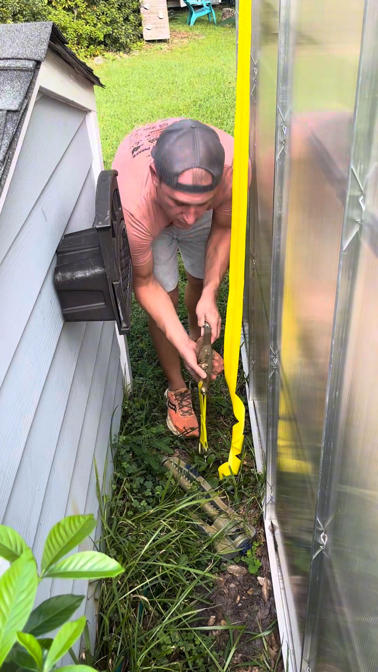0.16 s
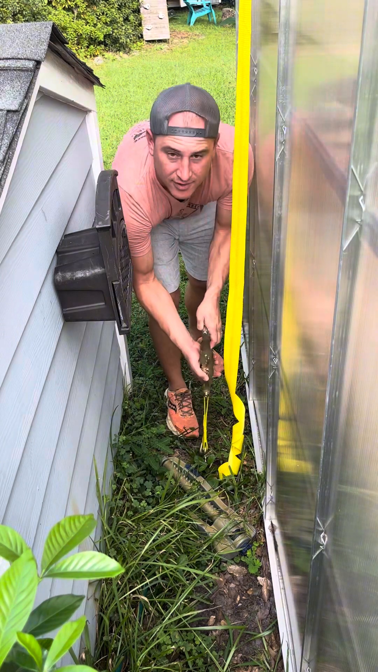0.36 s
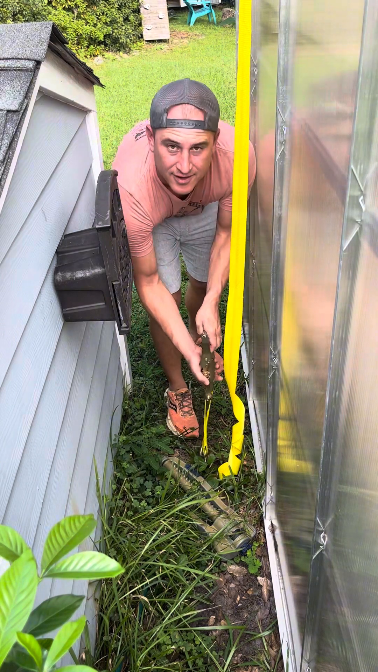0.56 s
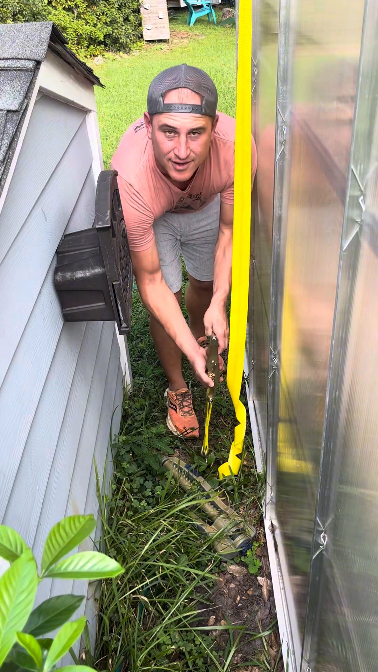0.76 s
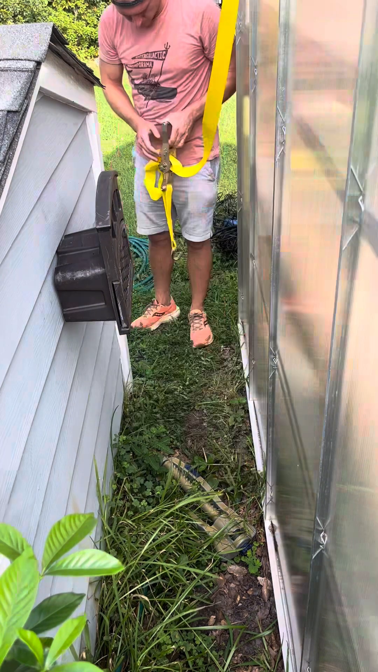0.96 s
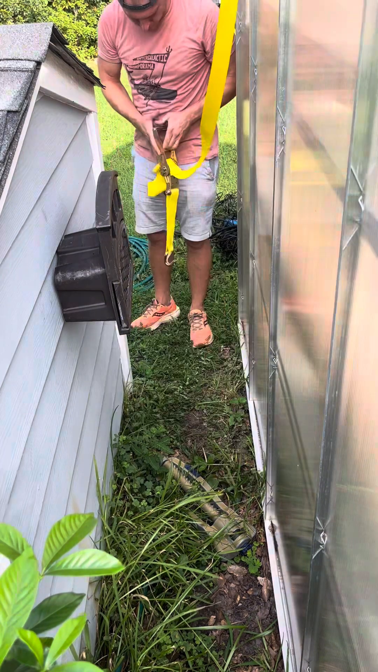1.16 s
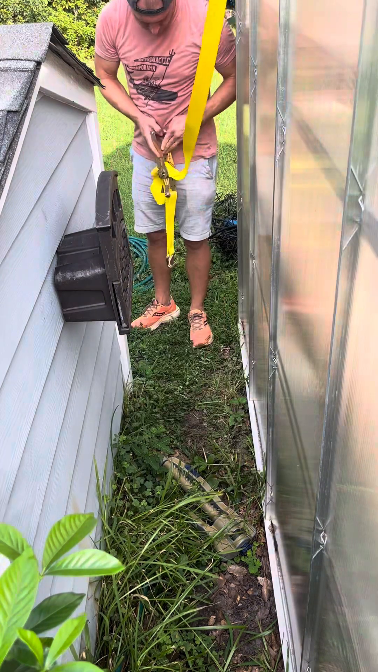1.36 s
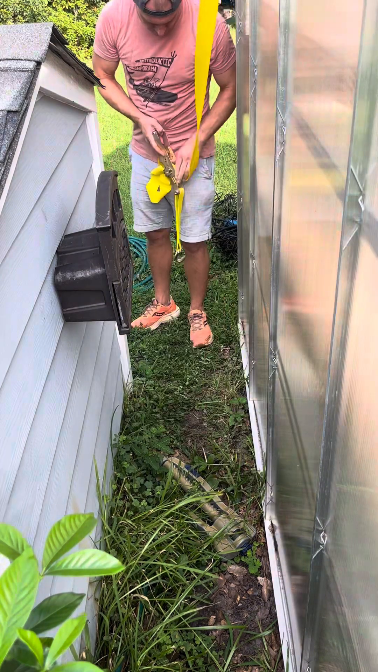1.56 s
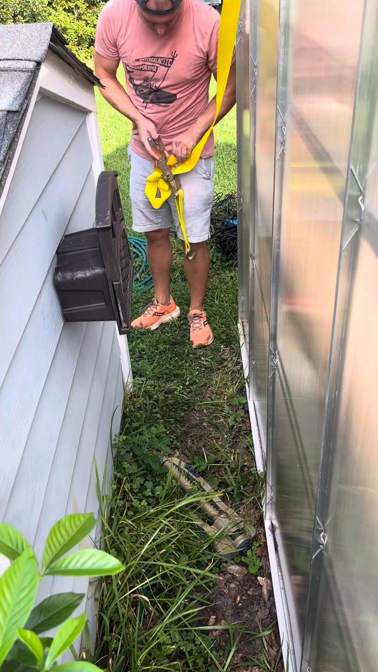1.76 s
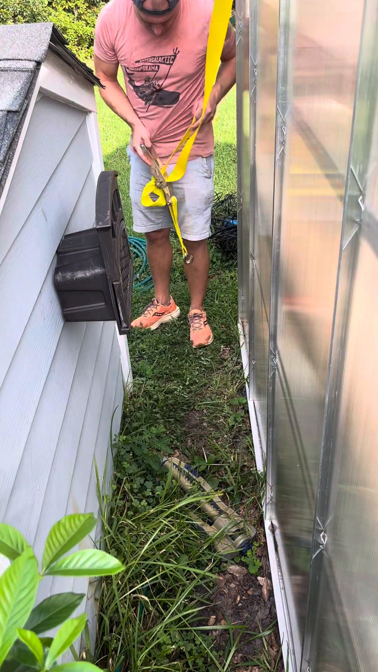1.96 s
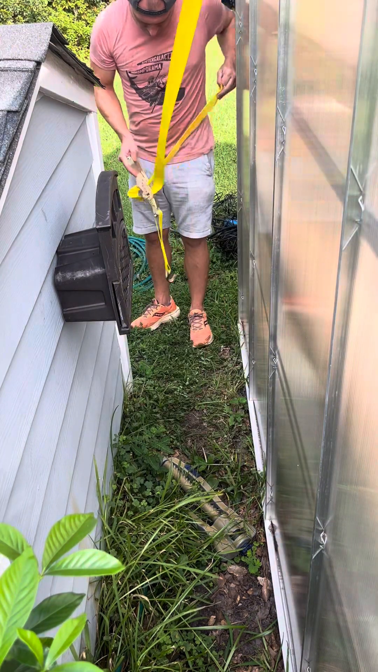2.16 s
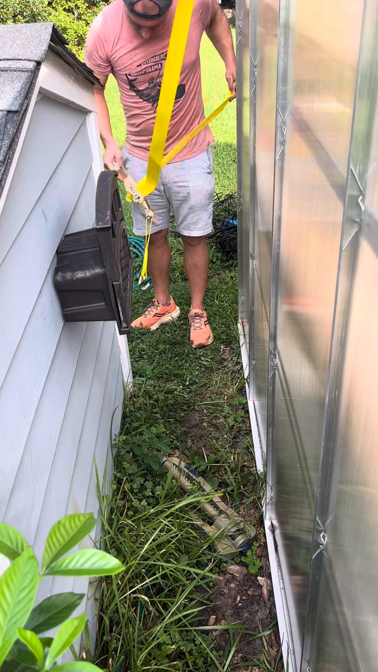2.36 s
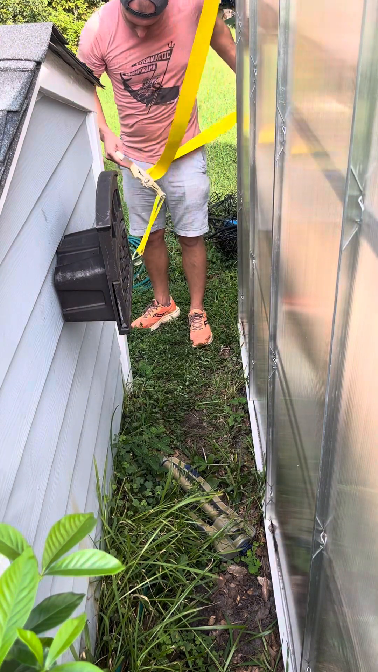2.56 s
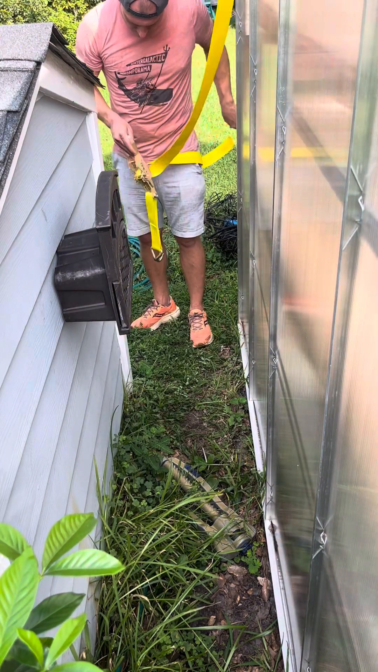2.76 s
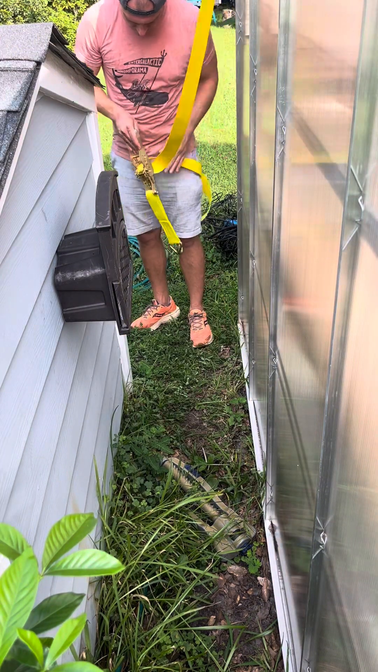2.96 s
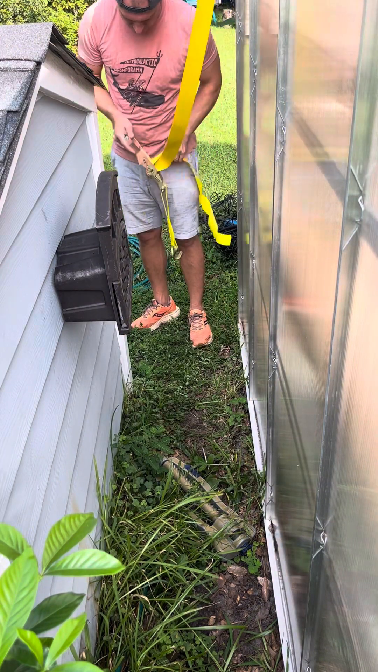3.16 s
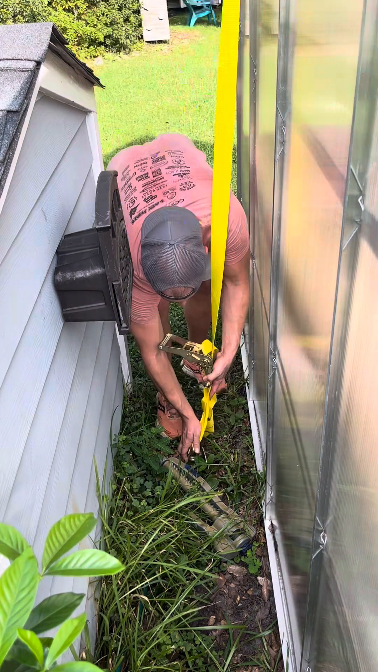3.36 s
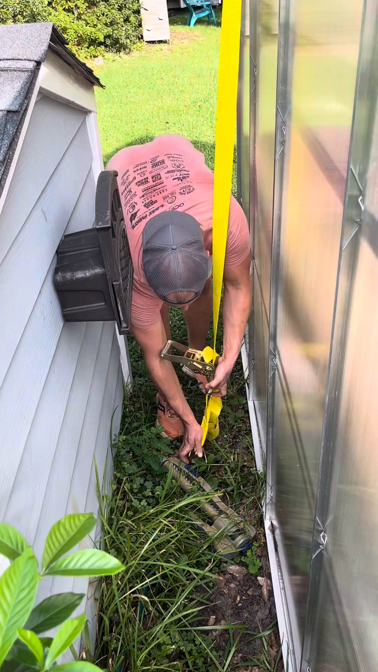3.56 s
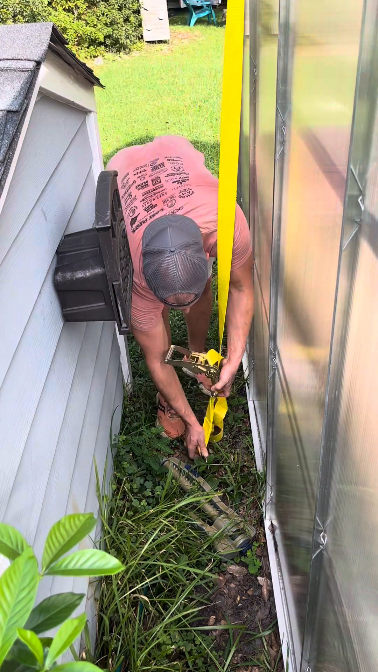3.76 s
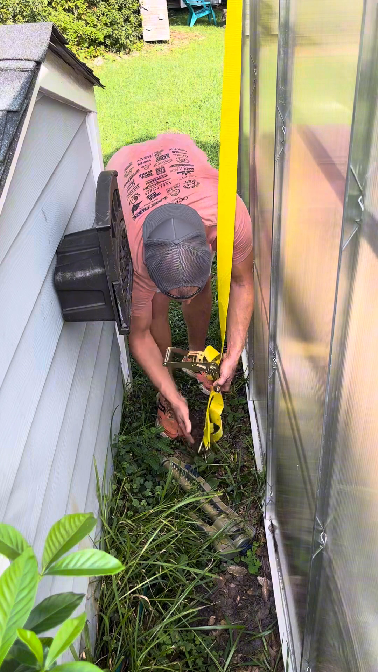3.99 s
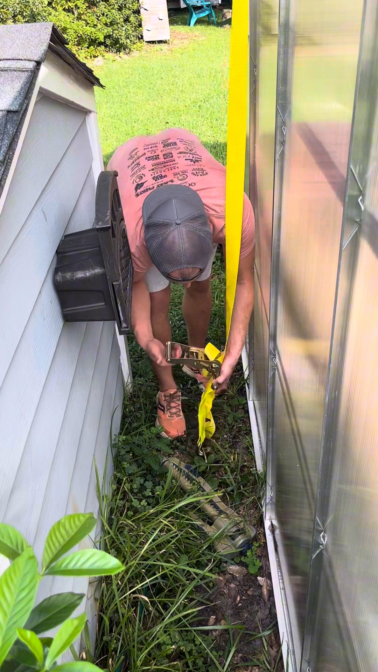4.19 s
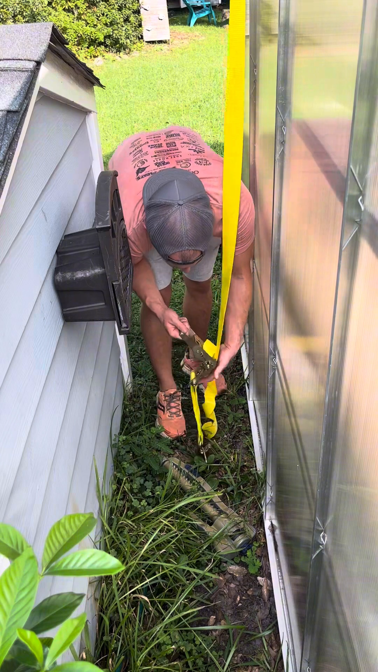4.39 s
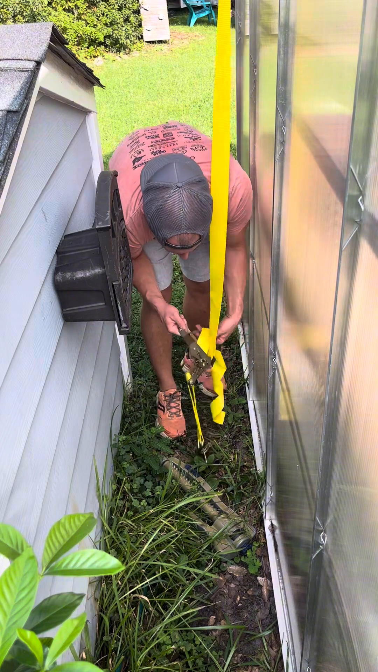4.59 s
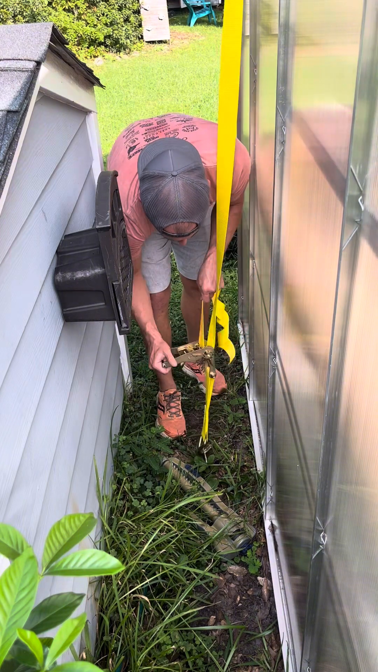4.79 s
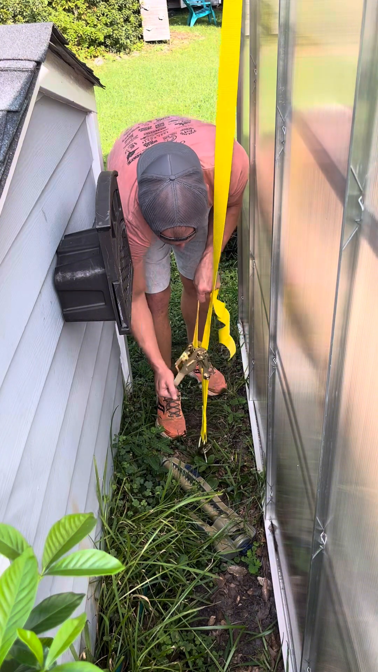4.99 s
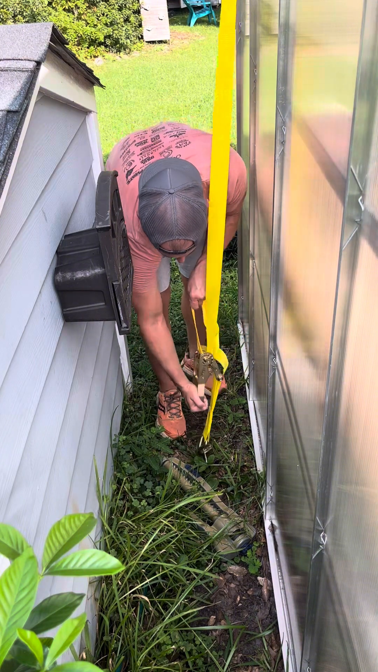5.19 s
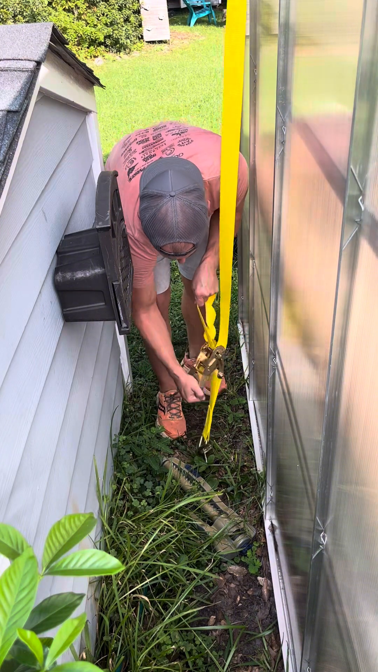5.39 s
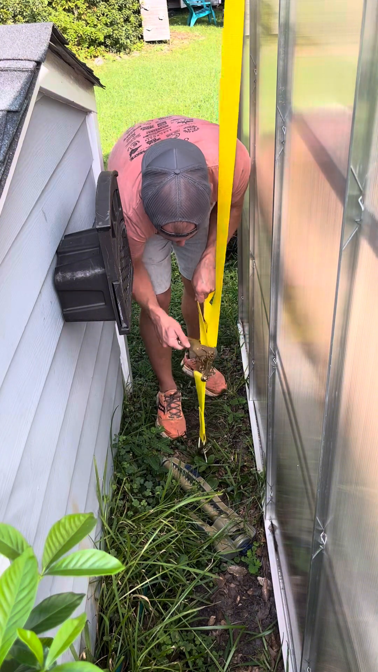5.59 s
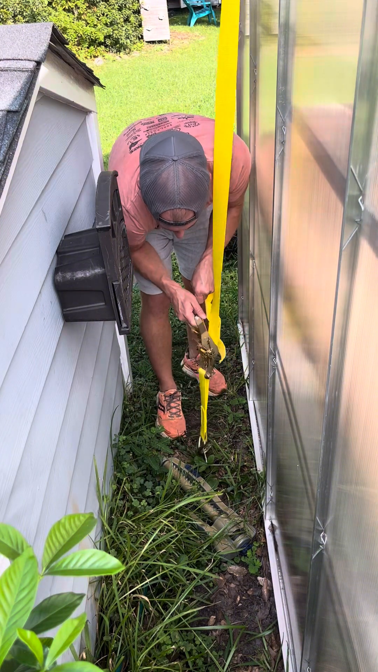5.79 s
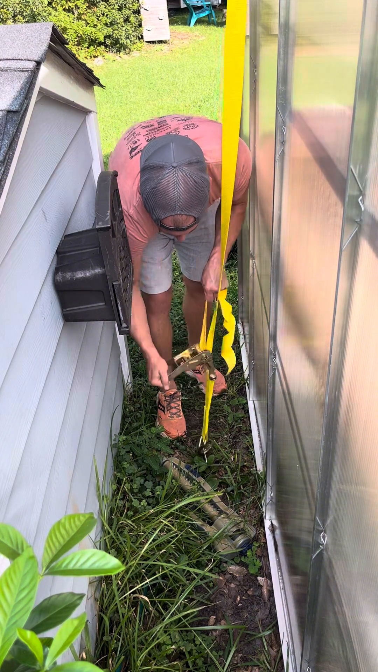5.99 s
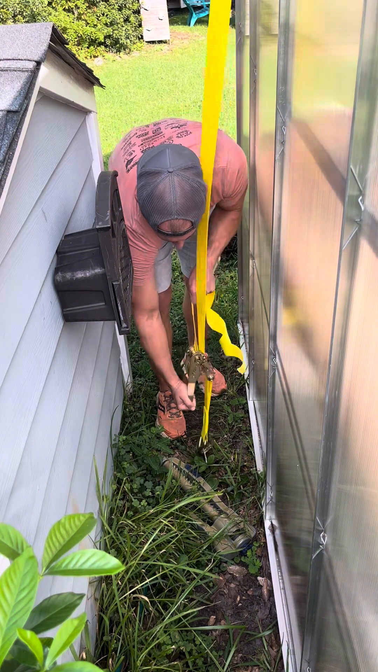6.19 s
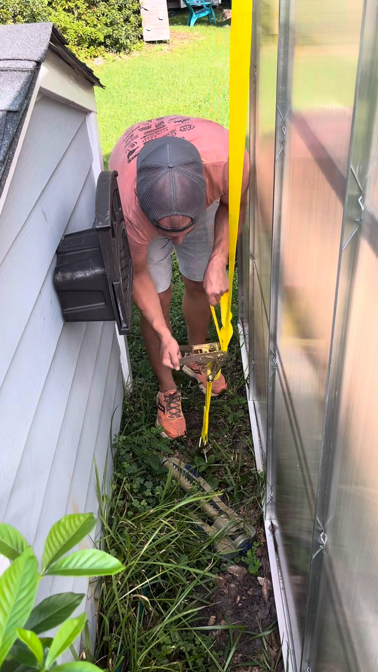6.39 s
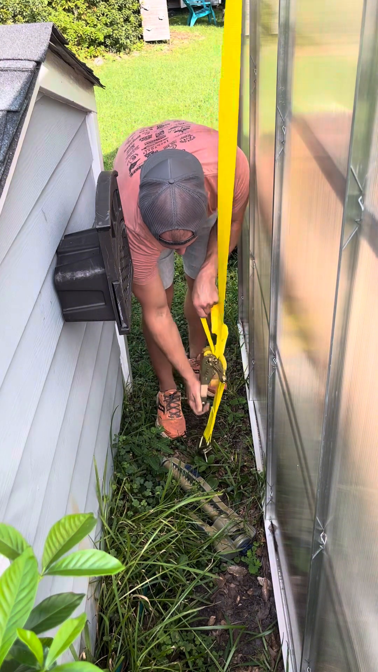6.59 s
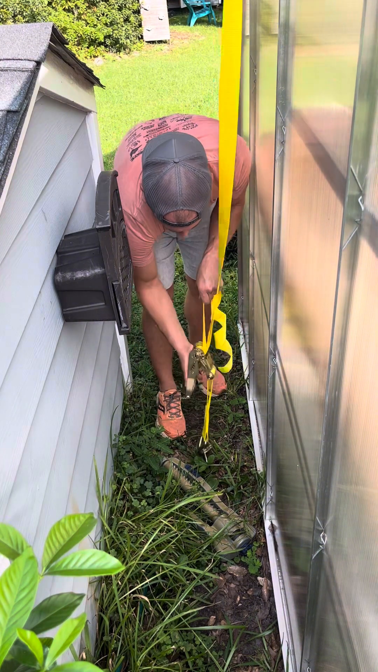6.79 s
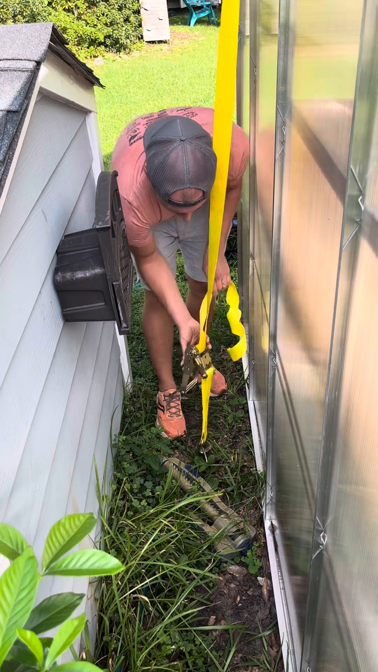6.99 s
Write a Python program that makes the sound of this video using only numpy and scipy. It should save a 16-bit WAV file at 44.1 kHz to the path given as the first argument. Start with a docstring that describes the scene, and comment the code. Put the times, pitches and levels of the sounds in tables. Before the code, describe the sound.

Outdoors, small metal clinks and faint strap swishes, then loud sharp ratchet clicks in quick bursts of two and three, over low rumble.

```python
"""Ratchet strap tightening

A steel ratchet strap is tightened in a narrow gap between a shed and a greenhouse.
Hook and handle clink as decaying modes while the webbing swishes as grainy noise.
Then the pawl snaps over the teeth in runs of two and three: noise bursts plus frame modes.
Behind: noise rumble and air, a distant engine in the first second, thin insect bands, a brief bird whistle."""
import sys
import numpy as np
from scipy import signal
from scipy.fft import rfft, irfft, next_fast_len
from scipy.io import wavfile
from scipy.ndimage import uniform_filter1d

SR = 44100
rng = np.random.default_rng(int(sys.argv[2]) if len(sys.argv) > 2 else 0)


def generate_wav(signal):
    """Clip the signal to [-1, 1] and save it as 16-bit WAV at the path in sys.argv[1]."""
    frames = np.transpose(np.atleast_2d(signal))
    scaled = np.clip(frames, -1, 1) * 32767
    pcm = np.round(scaled).astype(np.int16)
    wavfile.write(sys.argv[1], SR, pcm)


N = 310903
TIME = np.arange(N) / SR
HIT_TIME = np.arange(SR // 2) / SR

# pawl snaps: snap_s, level_db, slip_before_snap_s, slip_db, clank_hz, clank_db,
# favoured_mode_hz, favoured_ring_db
PAWL_SNAPS = [(4.923, -11.5, .012, -11.5, 4660, 9, 7490, -10),
              (5.0442, -14, .0022, -1, 9700, 5.5, 12170, -27),
              (5.4398, -36.5, 0.0021, 0, 5250, -5, 5240, -20),
              (5.5382, -11, .0052, -3, 7050, 8.5, 7150, 1.5),
              (5.6002, -12.5, 0.0066, -4.5, 7200, 10, 5240, -23),
              (5.6583, -12, .0045, -9, 7100, 11, 11620, -5),
              (5.8742, -29, 0.00081, -21, 1900, 16, 7490, -19),
              (5.9546, -12.5, .0042, -0.5, 6900, 9, 4500, -20.5),
              (6.0123, -12, .0068, -4.5, 4730, 7, 11800, -27),
              (6.074, -10, .0054, -3.5, 9350, 6, 3640, -14),
              (6.318, -28.5, 0.0038, -5, 3550, 2.5, 3640, -21),
              (6.4158, -13, 0.0065, 0.5, 7300, 7, 2340, -37),
              (6.4642, -21.5, 0.0026, 4.5, 7240, 14.5, 7150, 5.5)]


def undb(db):
    """Decibels to amplitude gain."""
    return 10 ** (np.asarray(db) / 20)


def unit(x):
    """Scale to rms 1."""
    return x / np.sqrt(np.mean(x ** 2))


def decay(t, t60):
    """Exponential fade from t = 0, 60 dB in t60 seconds; zero before."""
    return (t >= 0) * np.exp(-np.log(1000) * np.maximum(t, 0) / t60)


def add(track, s, sound):
    """Mix a sound into a track at time s."""
    i = int(s * SR)
    track[i:i + len(sound)] += sound[:len(track) - i]


def colour(x, points, keep_power=False):
    """Causal minimum-phase filter through (hz, db) points, built from the folded cepstrum."""
    size = 2 * next_fast_len(len(x))
    hz, db = np.transpose(points)
    log_bins = np.log(np.fft.rfftfreq(size, 1 / SR) + 1)
    gain = undb(np.interp(log_bins, np.log(hz), db))
    cepstrum = irfft(np.log(unit(gain) if keep_power else gain))
    cepstrum[1:] *= 2
    response = np.exp(rfft(cepstrum[:size // 2], size))
    return irfft(rfft(x, size) * response)[:len(x)]


def band(hz, width_hz, size=N):
    """Noise passed twice through one resonance, rms 1."""
    b, a = signal.iirpeak(hz, hz / width_hz, fs=SR)
    once = signal.lfilter(b, a, rng.standard_normal(size))
    return unit(signal.lfilter(b, a, once))


def walk(rate_hz):
    """Slow random wander with a spread near 1."""
    k = int(SR / rate_hz)
    steps = np.repeat(rng.standard_normal(N // k + 1), k)
    return unit(uniform_filter1d(steps, k)[:N])


def swell(middle_s, length_s):
    """Smooth rise and fall that stays above half power for length_s."""
    return 2 ** (-2 * ((TIME - middle_s) / length_s) ** 2)


def after_snaps(t60):
    """Envelope that jumps with the strength of each snap and fades."""
    power = sum((undb(db) * decay(TIME - s, t60)) ** 2 for s, db, *_ in PAWL_SNAPS)
    return np.sqrt(power)


def ring(modes, ring_db, favoured_hz, favoured_db, scatter_db, grip_s):
    """Steel modes after a blow; the point of contact favours one and the hand damps them all."""
    hz, db, t60 = np.transpose(modes)
    chance = rng.standard_normal((len(hz), 2))
    gain = undb(ring_db + db + scatter_db * chance[:, 0])
    gain[np.argmin(abs(hz - favoured_hz))] = undb(favoured_db)
    waves = np.sin(2 * np.pi * (hz[:, None] * HIT_TIME + chance[:, 1:]))
    grip = np.exp(-(HIT_TIME / grip_s) ** 2)
    return np.sqrt(2) * gain @ (waves * decay(HIT_TIME, t60[:, None])) * grip


def jangle(t60, count):
    """Many short modes of small loose parts, different at each contact; starts near rms 1."""
    place, phase, size = rng.random((3, count, 1))
    hz = 1500 + 13500 * (np.arange(count)[:, None] + place) / count
    t = HIT_TIME[:len(HIT_TIME) // 3]
    waves = unit(np.sum(size * np.sin(2 * np.pi * (hz * t + phase)), axis=0))
    return np.pad(waves, (0, len(HIT_TIME) - len(t))) * decay(HIT_TIME, t60)


def engine(partials_db=(0, -13, -21), waver_db=1, click_db=-23, click_t60=0.00028):
    """A distant exhaust drone sinks in pitch and swells, then is cut short with a small click."""
    start_hz, idle_hz, slowing_s = 84.7, 66, .65
    start_db, end_db, cut_s = -53.5, -31.5, .982
    hz = idle_hz + (start_hz - idle_hz) * np.exp(-TIME / slowing_s)
    phase = 2 * np.pi * np.cumsum(hz) / SR
    loudness = np.interp(TIME, [0, cut_s], undb([start_db, end_db]))
    # uneven cylinders put the partials half a firing rate apart
    drone = sum(undb(db + waver_db * walk(15.4)) * np.sin((k + 2) / 2 * phase)
                for k, db in enumerate(partials_db))
    click = undb(click_db) * decay(TIME - cut_s, click_t60)
    return np.sqrt(2) * drone * loudness * (TIME < cut_s) + click


def insects(flutter_db=4.0):
    """Narrow, fluttering noise bands of song far off in the grass."""
    # song bands: centre_hz, width_per_filter_pass_hz, level_db, start_s, end_s
    songs = [(7160, 240, -74, 0, 8.1), (8120, 630, -72.5, 0, 7.1), (8780, 590, -65, 0, .98),
             (7700, 1200, -68.5, 0, .98)]
    out = np.zeros(N)
    for hz, width_hz, db, start_s, end_s in songs:
        sounding = (TIME >= start_s) * (TIME < end_s)
        out += band(hz, width_hz) * undb(db + flutter_db * walk(22)) * sounding
    return out


def outdoors(air_db=-54, whine_hz=646, whine_db=-70, waver_db=3):
    """Rumble common to both ports, a diffuse wash of distant noise and a faint wavering whine."""
    # rumble spectrum, normalised to rms 1 in use: hz, relative_db
    rumble_colour = [(20, -28.5), (33, -22), (45, -4), (58, 2.5), (80, -3), (100, -6), (125, -3),
                     (170, -12.5), (250, -16.5), (400, -24), (700, -48.5), (2000, -83)]
    # distant wash spectrum, normalised to rms 1 in use: hz, relative_db
    air_colour = [(100, 1.5), (300, 8), (480, 3), (700, 2.5), (1100, 2), (1600, -5), (2300, -11.5),
                  (4000, -20.5), (6300, -48), (9500, -53), (14400, -47), (15500, -55.5)]
    rumble_db, ease_db_per_s, gust_db, gusts_hz = -43, 0.53, 1, 8
    tug_db, tug_smooth_s, tug_t60_s = -32, .02, 1.9  # tug_db is against the snap

    # each snap tugs the taut strap, which swells the rumble
    tugs = undb(tug_db) * uniform_filter1d(after_snaps(tug_t60_s), int(tug_smooth_s * SR))
    steady = undb(rumble_db - ease_db_per_s * TIME + gust_db * walk(gusts_hz))
    rumble = unit(colour(rng.standard_normal(N), rumble_colour)) * np.hypot(steady, tugs)

    air = np.array([unit(colour(rng.standard_normal(N), air_colour)) for _ in range(2)])
    air = air * undb(air_db) * undb(.5 * walk(2))
    # the left port faces the open side
    air[0] = colour(air[0], [(380, -12.5), (700, 6.5), (1300, -1.5), (2500, -2.0)])

    whine = undb(whine_db + waver_db * walk(4.4)) * band(whine_hz, 7.7)
    return rumble + air + whine


def weave(grain_db=1.5):
    """Webbing catches and slips in small uneven grains; rms 1."""
    # webbing spectrum: hz, relative_db
    strap_colour = [(300, -5), (1800, 11), (3000, 6), (5000, 8.5), (7500, 6), (10000, 0), (12300, -3),
                    (15500, -10)]
    grains = rng.standard_normal(N) * undb(grain_db * walk(400))
    return unit(colour(grains, strap_colour))


def strap(top_hz=9500):
    """The webbing swishes in each pull, settles on the spool after each snap and rubs in the hands."""
    # pulls of webbing through the hands: middle_s, length_s, level_db, top_db
    hand_pulls = [(0.24, 0.084, -62.5, -23), (1.605, 0.024, -71, -5), (1.865, 0.56, -69.5, 10),
                  (2.1, 0.039, -56, -1), (2.382, 0.089, -61.5, 5), (3.66, 0.24, -64.5, 11),
                  (4.15, 0.32, -64, 6), (4.638, 0.15, -64, 4), (4.922, 0.021, -38.5, -5),
                  (5.452, 0.027, -52, -4), (5.83, 0.45, -57.5, 8), (6.366, 0.075, -54.5, -3)]
    settle_db, settle_t60_s, hold_db = -41, .75, -68.5  # settle_db is against the snap
    rub = weave()
    highpass = signal.butter(2, top_hz, "high", fs=SR, output="sos")
    top = signal.sosfiltfilt(highpass, rub)
    pulls = sum(undb(db) * swell(s, length_s) * (rub + (undb(top_db) - 1) * top)
                for s, length_s, db, top_db in hand_pulls)
    settling = undb(settle_db) * after_snaps(settle_t60_s)
    return pulls + weave() * np.hypot(undb(hold_db), settling)


def hook(tick_t60=0.024, jangle_db=-10, jangle_t60=0.072):
    """Loose steel parts touch: a tick, the short clank of the handle, the long thin ring of the hook."""
    # clinks: start_s, level_db (before a common +3 dB), body_db, top_db, hook_ring_db,
    # favoured_mode_hz, favoured_ring_db
    clinks = [(.4200, -45.5, 10, -28, -51, 2260, -40), (0.4948, -44.5, 1.5, -11, -11, 9270, 4),
              (0.5826, -47.5, -9, -9, -22, 2945, -8), (.654, -27.5, -7, 4, -41, 6864, -25),
              (.6605, -41, 4, 1, -34, 2260, -15), (1.3676, -32.5, 1, 5.5, -52, 6864, -34),
              (2.109, -50.5, 0, 0, -26, 6864, -30), (3.7015, -41.5, -6, 4, -15, 6864, -16),
              (3.708, -29, -10, 1.5, -35, 11030, -14), (3.7939, -35, -12, -1, -36, 3138, -24),
              (3.7991, -31, -4, 3.5, -20, 6864, -2), (3.9926, -43, 7.5, 10, -6, 12470, -10),
              (4.022, -55, 0, -8, 4.5, 3138, 7), (4.117, -43.5, -1, 1, -14.5, 5640, -3),
              (4.2054, -39, 1, 1, -29, 3607, -14), (4.2193, -32, -3.5, -6, -45, 3607, -15),
              (4.283, -50.5, 5, -10, -14.5, 10570, -12), (4.3960, -39, 2, 5, -28, 2260, -7),
              (4.3990, -40, -11, -7, -28, 9270, -2), (6.7815, -37, -5, -9.5, -35, 6864, -16.5),
              (6.938, -50.5, -2, 4, -17.5, 2260, -6)]
    # hook modes, before hand damping: hz, relative_db, t60_s
    hook_modes = [(2263, -17, .16), (2428, -11, 0.42), (2925, 0, 0.19), (3136, 4, 0.095),
                  (3594, -29, 0.059), (5590, 2, 0.14), (6240, 8, 0.16), (6760, 4.5, 0.11), (7170, -4, .18),
                  (9310, 2.5, 0.17), (10250, 6, 0.13), (10980, 9, 0.16), (12470, -21.5, 1)]
    # handle modes, before extra damping by the palm: hz, relative_db, t60_s
    handle_modes = [(2280, 11.5, 0.06), (2990, 10.5, 0.063), (3700, -7, 0.046), (4950, -59, 0.022),
                    (5320, -20, 0.076), (6920, 22, 0.047), (7240, -9, 0.026), (8150, -10, 0.031),
                    (10050, 19, 0.033), (12230, 6.5, 0.03), (11500, -19, 0.017), (12700, -27, 0.022)]
    # tick spectrum, normalised in use: hz, relative_db
    tick_colour = [(200, 4.5), (800, -9), (1400, -1), (2400, -4.5), (3900, -5.5), (5200, 6), (7000, 3.5),
                   (8800, -1.5), (11500, 0.5), (15500, -13)]
    handle_db = -30.5  # against the clink
    out, t = np.zeros(N), HIT_TIME
    for s, db, body_db, top_db, ring_db, hz, favoured_db in clinks:
        contact = decay(t, tick_t60) * rng.standard_normal(len(t))
        contact += undb(jangle_db) * jangle(jangle_t60, count=30)
        tick = colour(contact, tick_colour, True)
        tick = colour(tick, [(2200, body_db), (5000, 0), (12000, top_db)])
        clank = ring(handle_modes, handle_db, hz, handle_db, scatter_db=3, grip_s=0.038)
        ping = ring(hook_modes, ring_db, hz, favoured_db, scatter_db=1.5, grip_s=0.16)
        add(out, s, undb(db + 3.0) * (tick + clank + ping))
    return out


def bumps():
    """Soft, heavily damped knocks: decaying noise bands."""
    # dull bumps and scuffs of strap and feet: start_s, peak_db (before a common +2.5 dB), centre_hz, t60_s
    knocks = [(.655, -42, 460, 0.12), (.66, -34, 2170, 0.045), (1.37, -37, 1140, 0.065),
              (1.368, -37, 2510, 0.036), (1.37, -37, 4730, 0.028), (1.8, -55, 2380, .3),
              (1.871, -53.5, 1850, .4), (2.083, -36.5, 300, 0.31), (2.081, -43.5, 2080, .12),
              (2.12, -33.5, 82, 0.98), (3.988, -46, 338, .37), (4.393, -43, 302, 0.12),
              (5.70, -30, 60, 0.38), (6.357, -51, 3300, .09), (6.614, -53, 1700, 0.039)]
    out = np.zeros(N)
    for s, db, hz, t60 in knocks:
        knock = band(hz, 0.6 * hz, size=len(HIT_TIME)) * decay(HIT_TIME, t60)
        add(out, s, undb(db + 2.5) * knock / abs(knock).max())
    return out


def pawl(climb_s=.015, climb_db=-21, climb_t60=0.026, snap_t60=0.032, slip_t60=0.056,
         bounce_s=0.0028, bounce_db=-2, rattle_db=-12, rattle_t60=0.11, echo_s=0.022, echo_db=-17,
         jangle_db=-8, jangle_t60=0.056, clank_span=1.096, chatter_db=3.0):
    """The pawl climbs a tooth, slips off, snaps onto the next and bounces; the shed wall answers."""
    # ratchet frame modes, before hand damping: hz, relative_db, t60_s
    frame_modes = [(2335, -2, .17), (3650, 1, .11), (4700, -2.5, .064), (5240, 4, .07), (6890, 2, .053),
                   (7150, 2, .03), (7490, -14, .17), (8046, -3.5, .07), (9310, 1.5, .09), (11620, -12, .08),
                   (12170, -5, .13), (13110, -4.5, .1)]
    # snap spectrum, normalised in use: hz, relative_db
    snap_colour = [(200, -30), (750, -26), (1500, -12), (2400, -7.5), (4200, -9.5), (5250, 1), (6150, -2),
                   (7100, 0), (7800, -4.5), (9300, -0.5), (10300, -4.5), (12100, 0), (14000, -5.5),
                   (15500, -19.5)]
    # a harder snap is brighter: tone of a full snap and its change per dB of level
    full_snap_db, full_body_db, full_top_db = -12.5, 1, 2.2
    body_per_db, top_per_db = -0.04, 0.34
    out, t = np.zeros(N), HIT_TIME - climb_s
    for s, db, slip_s, slip_db, clank_hz, clank_db, hz, ring_db in PAWL_SNAPS:
        body_db = full_body_db + body_per_db * (db - full_snap_db)
        top_db = full_top_db + top_per_db * (db - full_snap_db)
        after = t - slip_s
        stages = [undb(slip_db + climb_db) * decay(-t, climb_t60),
                  undb(slip_db) * decay(t, slip_t60),
                  decay(after, snap_t60),
                  undb(bounce_db) * decay(after - bounce_s, snap_t60),
                  undb(rattle_db) * decay(after, rattle_t60),
                  undb(echo_db) * decay(after - echo_s, snap_t60)]
        # tiny uneven impacts: the noise level steps about every millisecond
        steps = np.repeat(rng.uniform(-1, 1, len(t)), SR // 1000)[:len(t)]
        chatter = unit(undb(chatter_db * steps))
        contact = np.linalg.norm(stages, axis=0) * chatter * rng.standard_normal(len(t))
        add(contact, climb_s + slip_s, undb(jangle_db) * jangle(jangle_t60, count=36))
        crack = colour(contact, snap_colour, True)
        crack = colour(crack, [(4500, body_db), (7200, 0.025), (11500, top_db)])
        # the angle of the handle brings out one broad resonance
        crack = colour(crack, [(clank_hz / clank_span, 0), (clank_hz, clank_db), (clank_hz * clank_span, 0)])
        add(out, s - slip_s - climb_s, undb(db - 1.5) * crack)
        add(out, s, undb(db) * ring(frame_modes, -27.5, hz, ring_db, scatter_db=2, grip_s=0.11))
    return out


def bird():
    """One faint distant whistle, a sine that sags in pitch."""
    middle_s, length_s, middle_hz, sag_hz_per_s, level_db = 6.56, 0.064, 2715, 680, -64
    hz = middle_hz - sag_hz_per_s * (TIME - middle_s)
    whistle = np.sqrt(2) * np.sin(2 * np.pi * np.cumsum(hz) / SR)
    return whistle * undb(level_db) * swell(middle_s, length_s)


def yard(x, tail_db=-31, tail_t60=0.63):
    """A faint diffuse tail from the surrounding garden: decaying noise, independent at each port."""
    tails = [unit(rng.standard_normal(len(HIT_TIME))) * decay(HIT_TIME, tail_t60) for _ in range(2)]
    return undb(tail_db) * np.array([signal.fftconvolve(x, h / np.linalg.norm(h))[:N] for h in tails])


def ports(direct, scattered):
    """Two spaced ports hear the direct sound out of step; close walls scatter with opposite signs."""
    # phase by which the left port leads: hz, lead_rad
    port_phase = [(0, 0), (800, -.7), (1600, -.1), (2500, 2), (4100, .9), (5100, 1.3), (6000, 3.2),
                  (7600, 6), (8700, 6.9), (10000, 9.4), (10800, 9.8), (12100, 12.2), (13000, 12.8),
                  (14200, 15.5), (16000, 16)]
    # sound arriving from the walls: hz, gain_db
    wall_colour = [(300, -23.5), (700, -9), (1700, -23.5), (3000, -11), (4300, -4.5), (6500, -36.5),
                   (12000, -18.5), (15500, -14)]
    size = next_fast_len(N + SR)
    lead_rad = np.interp(np.fft.rfftfreq(size, 1 / SR), *np.transpose(port_phase))
    turn = np.exp(.5j * lead_rad)  # half the lead to each port
    side = colour(scattered, wall_colour)
    pair = np.array([direct + side, direct - side]) + yard(direct)
    return irfft(rfft(pair, size) * np.array([turn, turn.conj()]), size)[:, :N]


def scene(wall_s=.004, stop_s=6.467):
    """All sources; the last snap stops abruptly."""
    stop = np.clip((stop_s - TIME) * 1000 + 1, 0, 1)  # 1 ms ramp
    ratchet = ports(pawl(), pawl()) * stop
    hands = hook() + strap() + bumps()
    off_wall = np.roll(hands, int(wall_s * SR))
    near_and_far = ports(hands + insects() + bird(), off_wall)
    return ratchet + near_and_far + engine() + outdoors()


def record(dry):
    """Clip peaks at full scale, then cut the top with a steep elliptic low-pass."""
    top_hz = 15800
    lowpass = signal.ellip(10, .2, 80, top_hz, fs=SR, output="sos")
    return signal.sosfilt(lowpass, np.clip(dry, -1, 1))


dry = scene()
out = record(dry)
generate_wav(out)
```